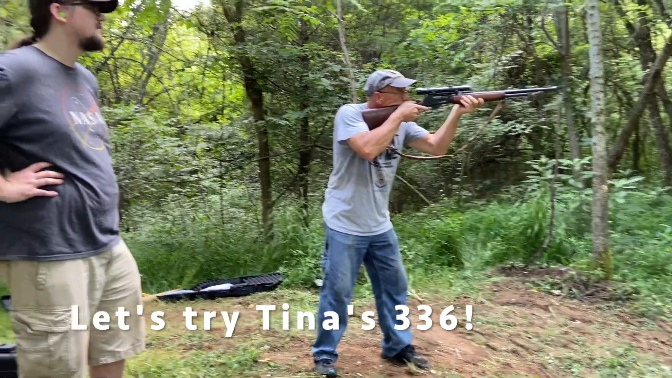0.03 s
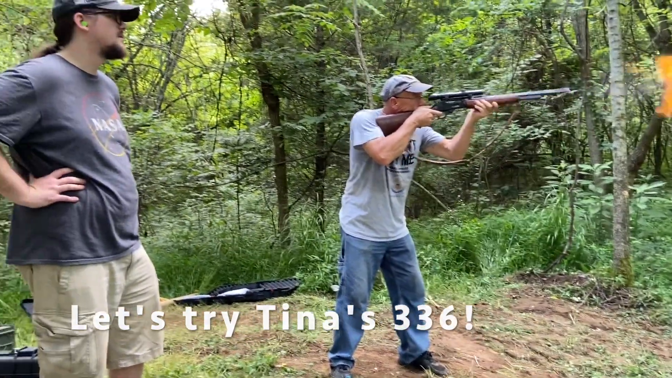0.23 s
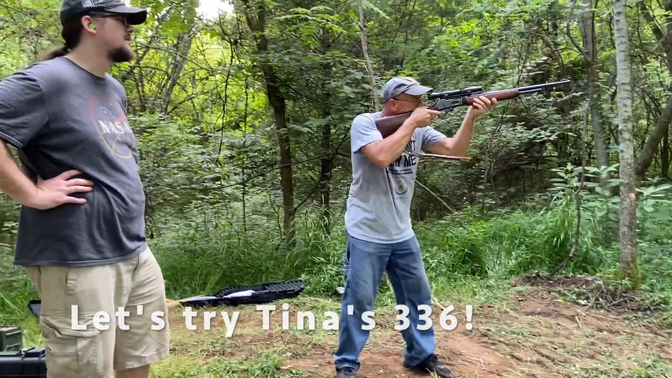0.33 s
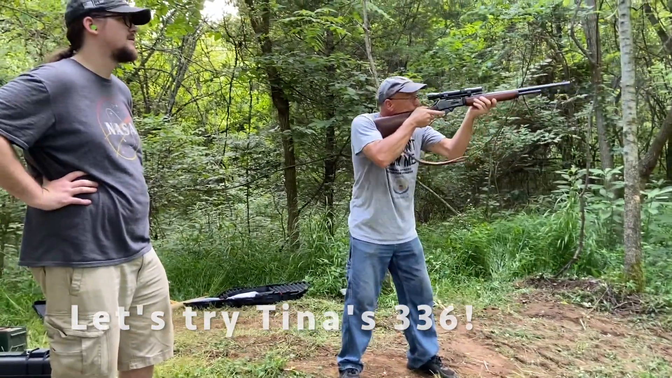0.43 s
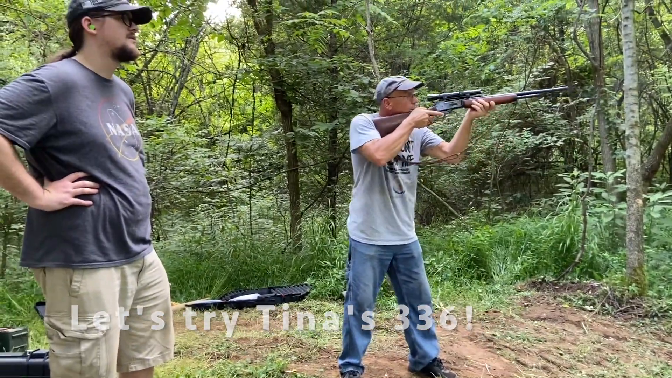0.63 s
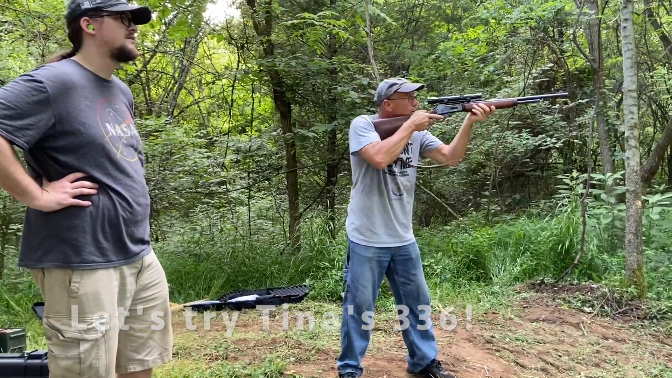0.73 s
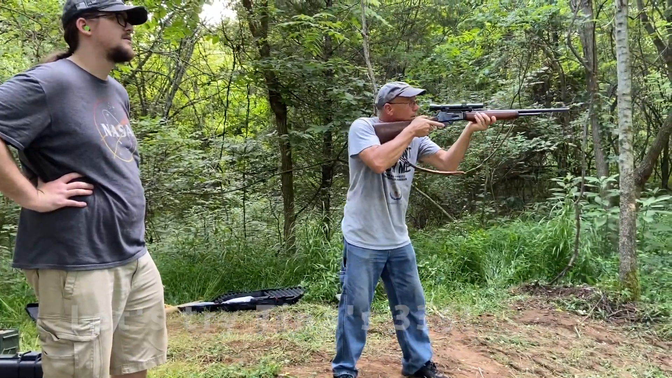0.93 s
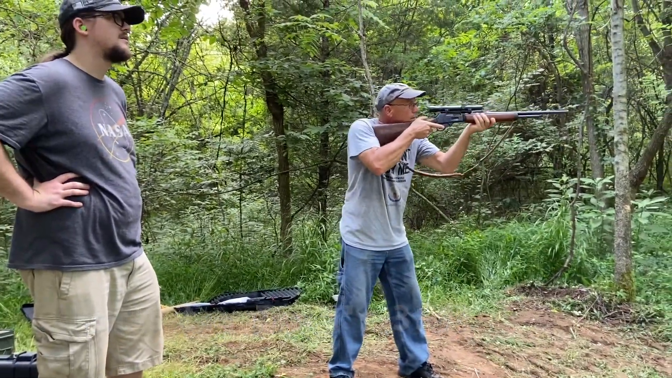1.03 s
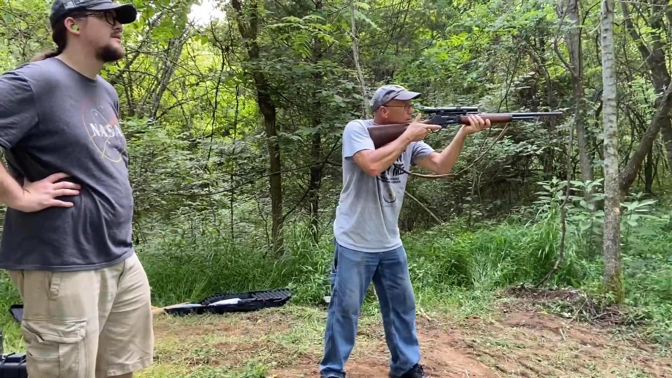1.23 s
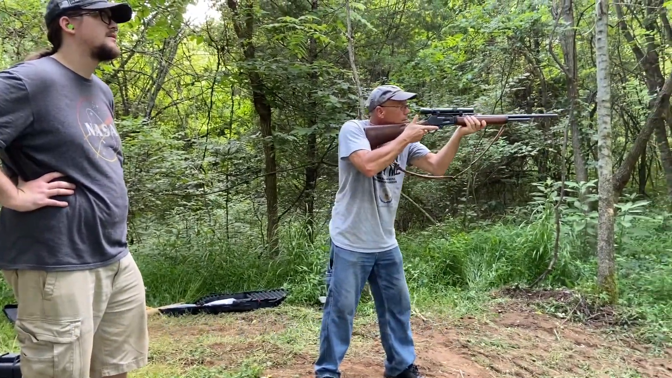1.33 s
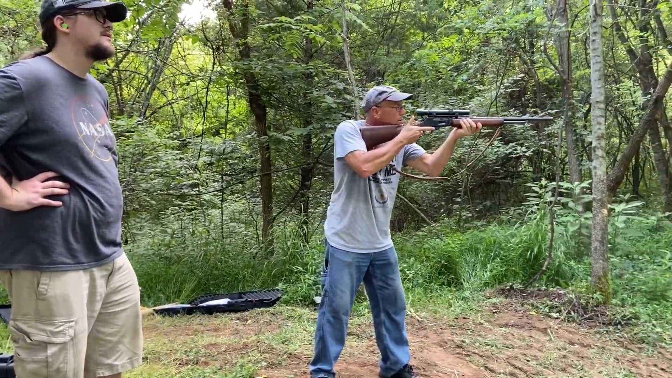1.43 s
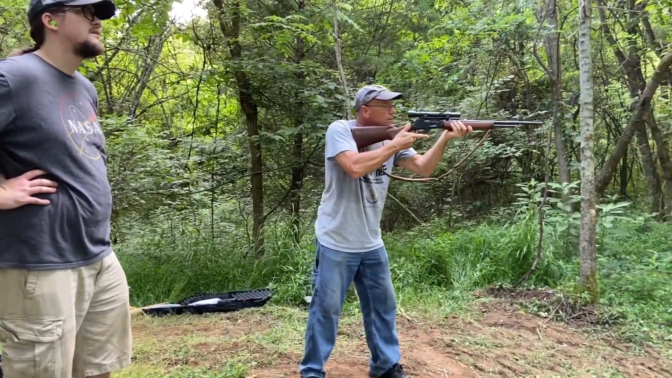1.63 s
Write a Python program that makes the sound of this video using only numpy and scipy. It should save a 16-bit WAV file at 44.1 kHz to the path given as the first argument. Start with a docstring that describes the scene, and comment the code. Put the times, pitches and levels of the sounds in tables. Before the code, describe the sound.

A rifle shot in a woodland clearing. Low rumbling air, soft hum and faint insects come first; at 0.19 s a tiny ringing, noisy swell leads into a sharp crack and short falling thump at 0.23 s. Background drops sharply. Echoes scatter from brush, swell from trees around 0.55 s and farther woods near 0.8 s, then fade. Light lever ticks at 1.18 s, firmer steel clacks at 1.55-1.61 s.

```python
"""One shot from a lever-action rifle in a woodland clearing: a noise crack and a falling sine thump,
led in by 30 ms of swelling, wavering tones and noise, and followed by decaying noise from brush and trees.
Then the lever is worked: ticks and clacks of short noise and ringing steel modes, with a faint falling whistle.
Behind lie rumbling air, a low hum and a narrow noise band of insects, all far lower after the shot."""
import sys
import numpy as np
from scipy import signal
from scipy.fft import rfft, irfft
from scipy.io import wavfile
from scipy.ndimage import uniform_filter1d

SR = 44100
rng = np.random.default_rng(int(sys.argv[2]) if len(sys.argv) > 2 else 0)


def wrap_up_sound(samples):
    """Save the sound to the file named by the first command line argument, as 16-bit audio."""
    columns = np.atleast_2d(samples).T
    # keep every value between -1 and 1, then stretch to whole-number steps
    tamed = np.clip(columns, -1, 1)
    steps = np.round(tamed * 32767).astype(np.int16)
    wavfile.write(sys.argv[1], SR, steps)


N = 74970
T = np.arange(N) / SR
CRACK_S = 0.2252


def amp(db):
    """Decibels to gain."""
    return 10 ** (np.asarray(db) / 20)


def evened(x):
    """Scales to rms 1."""
    return x / np.sqrt(np.mean(x ** 2) + 1e-20)


def read(points, hz):
    """Interpolates a table on a log-frequency axis."""
    f, value = np.transpose(points)
    return np.interp(np.log(hz + 1), np.log(f + 1), value)


def pan(db):
    """Left and right gains for a left-over-right level difference."""
    return evened(amp(np.array([[db], [-db]]) / 2))


def bins():
    """Frequencies of the full-length spectrum, Hz."""
    return np.fft.rfftfreq(N, 1 / SR)


def colour(points):
    """Gain per bin from a spectrum table."""
    return amp(read(points, bins()))


def noise(gain, same, grain_db=0):
    """Stereo noise of rms 1: gain per bin, left-right correlation, random level steps every 32 samples."""
    steps_db = grain_db * np.repeat(rng.standard_normal(N // 32 + 1), 32)[:N]
    a, b = rfft(rng.standard_normal((2, N)) * amp(steps_db))
    same = np.clip(same, -1, 1)
    right = same * a + np.sqrt(1 - same ** 2) * b
    return evened(irfft(np.array([a, right]) * gain, N))


def falling_sine(t, start_hz, end_hz, sag_s, sounding=1):
    """Sine whose pitch relaxes exponentially from start to end; phase runs only while sounding."""
    hz = end_hz + (start_hz - end_hz) * np.exp(-t / sag_s)
    return np.sin(2 * np.pi * np.cumsum(sounding * hz) / SR)


# Air rumble spectrum. Each row: frequency in Hz, relative level in dB per Hz.
AIR_SPECTRUM = [(25, -12), (60, 9.5), (110, -12.5), (200, -14), (400, -21), (800, -30.5), (1500, -34.5),
                (3000, -46), (7500, -51), (12000, -55.5), (16000, -70.5)]
AIR_DB, AIR_DROP_DB = -43, -22
HUM_HZ, HUM_DB, HUM_DROP_DB = 151, -53, -23.5
INSECT_HZ, INSECT_WIDTH_HZ, INSECT_DB, INSECT_DROP_DB = 5800, 220, -72, -29


def background():
    """Coloured noise, a sine hum and a Gaussian insect band; all drop over 50 ms from the crack."""
    after = np.clip((T - CRACK_S) / 0.05, 0, 1)
    air = noise(colour(AIR_SPECTRUM), same=0.71)
    hum = evened(np.sin(2 * np.pi * (HUM_HZ * T + rng.random())))
    insect_band = np.exp(-((bins() - INSECT_HZ) / INSECT_WIDTH_HZ) ** 2 / 2)
    insects = noise(insect_band, same=0.2)
    return (amp(AIR_DB + AIR_DROP_DB * after) * air
            + amp(HUM_DB + HUM_DROP_DB * after) * hum
            + amp(INSECT_DB + INSECT_DROP_DB * after) * insects)


SWELL_S, SWELL_RISE_S, SWELL_FALL_S = 0.19474, 0.011, 0.0016


def swell(lag_s):
    """Linear rise, hold, exponential fall from the crack."""
    rise = np.clip((T - SWELL_S - lag_s) / SWELL_RISE_S, 0, 1)
    return rise * np.exp(-np.maximum(T - CRACK_S, 0) / SWELL_FALL_S)


# Tones in the ringing swell before the crack. Each row: frequency in Hz, relative level in dB, pan in dB.
RING_TONES = [(218.6, 3.5, -14.5), (354, -0.5, 1.5), (432.2, 1, 2), (548, -5.5, -1), (797, -3.5, -4.5),
              (880, 1, -8.5), (1158, -2.5, -12.5), (1322, -2, -17), (1398, -13, 5), (1516, -7, -16),
              (1895, -6.5, -15), (2062, -13, -13.5), (2144, -12.5, -12), (2295, -15, -17.5),
              (2397, -9, -16), (2562, -7.5, 2), (2704, -12, -16), (3280, -18.5, -4), (3560, -17, -12),
              (3588, -14, -17.5), (4450, -22.5, 5.5), (4680, -12, -2), (4867, -10, -3), (5020, -9, 6),
              (5540, -14.5, 10), (5590, -13.5, 0), (7150, -20, 13)]
# Noise rush under the tones. Each row: frequency in Hz, relative level in dB per Hz.
RUSH_SPECTRUM = [(30, -8), (200, -4), (450, 0), (620, -2.5), (900, 2), (1700, -6), (2400, -8),
                 (4000, -15.5), (5400, -13.5), (6300, -26), (7300, -17.5), (9000, -39.5), (16000, -62)]
RING_DB, RING_WIDTH_HZ, RING_SAME = -11.5, 2, 0.8
RUSH_DB, RUSH_PAN_DB = -23.5, -11.5


def ringing_swell():
    """Phase-wandering tones over a noise rush; each tone starts one cycle late, so the low ones enter last."""
    ring = np.zeros((2, N))
    # constant phase lead of the right channel
    apart = np.arccos(RING_SAME) * np.array([[0], [1]])
    for hz, db, pan_db in RING_TONES:
        drift = np.cumsum(rng.standard_normal(N)) * np.sqrt(2 * np.pi * RING_WIDTH_HZ / SR)
        tone = np.sin(2 * np.pi * (hz * T + rng.random()) + drift + apart)
        ring += amp(db) * pan(pan_db) * swell(1 / hz) * tone
    ring_rms = np.sqrt(sum(amp(db) ** 2 for _, db, _ in RING_TONES) / 2)
    rush = pan(RUSH_PAN_DB) * swell(0) * noise(colour(RUSH_SPECTRUM), same=0.2)
    return amp(RING_DB) * ring / ring_rms + amp(RUSH_DB) * rush


# Crack spectrum. Each row: frequency in Hz, relative level in dB per Hz.
CRACK_SPECTRUM = [(60, -5), (500, -6.5), (2200, 7.5), (4000, -8), (7000, -6), (11000, -8.5), (16000, -27.5)]
CRACK_DB, CRACK_DECAY_S = -6.5, 0.0008
THUMP_DB, THUMP_START_HZ, THUMP_END_HZ = -9, 662, 72
THUMP_SAG_S, THUMP_LENGTH_S = 0.0028, 0.013


def blast():
    """Noise crack with a two-sided exponential envelope, then a falling sine under a Gaussian decay."""
    crack_level = amp(CRACK_DB) * np.exp(-abs(T - CRACK_S) / CRACK_DECAY_S)
    crack = crack_level * pan(db=-4.0) * noise(colour(CRACK_SPECTRUM), same=-0.21)
    t = np.maximum(T - CRACK_S, 0)
    thump = falling_sine(t, THUMP_START_HZ, THUMP_END_HZ, THUMP_SAG_S, sounding=t > 0)
    return crack + amp(THUMP_DB) * thump * np.exp(-(t / THUMP_LENGTH_S) ** 2)


# Left-right correlation of the echoes. Each row: frequency in Hz, correlation 0-1.
ECHO_SAME = [(60, 0.98), (200, 0.9), (500, 0), (1200, 0), (16000, 0.6)]
PATCH_RMS_DB, PATCH_HZ, PATCH_S = 1.58, 220, 0.045


def echo(spectrum, t60s, peak_s, rise_db_per_s, grain_db, crest_s=1 / SR):
    """Scattered reflections: noise builds to a rounded crest, dies at a rate per band, and rolls in patches."""
    source = noise(colour(spectrum), read(ECHO_SAME, bins()), grain_db)
    hz, t, z = signal.stft(source, SR, nperseg=512)
    # softened seconds before and after the peak
    before, after = crest_s * np.logaddexp(0, np.array([peak_s - t, t - peak_s]) / crest_s)
    level_db = -rise_db_per_s * before - 60 * after / read(t60s, hz)[:, None]
    patches = rng.standard_normal(level_db.shape)
    patches = uniform_filter1d(patches, max(1, round(PATCH_HZ / hz[1])), axis=0)
    patches = evened(uniform_filter1d(patches, max(1, round(PATCH_S / t[1])), axis=1))
    shaped = signal.istft(z * amp(level_db + PATCH_RMS_DB * patches), SR, nperseg=512)[1][:, :N]
    return shaped * np.clip((T - CRACK_S) / 0.0074, 0, 1)


# Echo spectra: near brush, tree line, far woods. Each row: frequency in Hz, relative level in dB per Hz.
BRUSH_SPECTRUM = [(30, -3), (90, 0.5), (200, 0), (380, -3), (900, -1.5), (2000, -7), (4000, -11),
                  (7000, -14.5), (9000, -26), (11500, -18.5), (16000, -34.5)]
TREES_SPECTRUM = [(30, -17), (90, 5), (140, 3), (220, -8.5), (500, 3), (900, 2.5), (1400, -6), (2500, -3),
                  (4000, -13), (7500, -19), (9200, -34), (11500, -26), (14000, -54.5)]
FAR_SPECTRUM = [(30, -13), (75, 6), (170, -14), (320, -0.5), (480, 3.5), (950, -13.5), (1500, -11),
                (2500, -22.5), (4500, -39), (8000, -58), (16000, -69)]
# Echo decays. Each row: frequency in Hz, time to fall 60 dB in seconds.
BRUSH_DECAY = [(100, 0.41), (900, 0.4), (4000, 0.56), (14000, 0.56)]
TREES_DECAY = [(100, 0.86), (450, 1.5), (850, 2.63), (2000, 0.93), (5000, 0.62), (12000, 0.43)]
FAR_DECAY = [(100, 4.7), (330, 6.4), (900, 2.73), (5000, 2.6)]
BRUSH_DB, TREES_DB, FAR_DB = -22, -30.5, -40.5
TREES_S, TREES_RISE_DB_PER_S, TREES_CREST_S = 0.55, 42, 0.025
FAR_S, FAR_RISE_DB_PER_S, FAR_CREST_S = 0.77, 33.5, 0.068


def woods():
    """Reflections from brush peak at once, from the tree line later, from the far woods last."""
    brush = echo(BRUSH_SPECTRUM, BRUSH_DECAY, CRACK_S, 0, grain_db=1.5)
    trees = echo(TREES_SPECTRUM, TREES_DECAY, TREES_S, TREES_RISE_DB_PER_S, grain_db=1.5, crest_s=TREES_CREST_S)
    far = echo(FAR_SPECTRUM, FAR_DECAY, FAR_S, FAR_RISE_DB_PER_S, grain_db=2.5, crest_s=FAR_CREST_S)
    return (amp(BRUSH_DB) * pan(db=0.6) * brush
            + amp(TREES_DB) * pan(db=-0.2) * trees
            + amp(FAR_DB) * pan(db=-0.6) * far)


# Lever, bolt and hammer contacts. Each row: start in seconds, level in dB, decay in seconds,
# brightness in dB per octave (flattens in the bass), steel ring in dB, pan in dB.
CONTACTS = [(1.183, -48, 0.0049, -5, -5, -1), (1.188, -51.5, 0.0098, -3, -10, 4),
            (1.194, -46.5, 0.0022, 6.5, -10, 1), (1.5481, -49.5, 0.016, -0.5, -6, 0),
            (1.556, -51, 0.0034, 1, -24, -8), (1.561, -33.5, 0.0038, -1, -3, 0),
            (1.5693, -43, 0.0099, 3, -12, 0), (1.6047, -32, 0.0015, 4, -29.5, 0.5),
            (1.609, -47.5, 0.0033, 5, -14, -7)]
# Rattle spectrum of the action. Each row: frequency in Hz, relative level in dB per Hz.
ACTION_SPECTRUM = [(200, -44), (800, 3), (1250, 9), (1900, 3), (3000, 1), (4200, 0), (6500, -9),
                   (7500, -1.5), (9000, -16), (11500, -4.5), (13500, -19), (15500, -9)]
# Steel modes. Each row: frequency in Hz, relative level in dB, time to fall 60 dB in seconds.
STEEL_MODES = [(1173, -8.5, 0.045), (1280, -3.5, 0.036), (1410, -10, .035), (2310, -9.5, 0.06),
               (2510, -5, 0.042), (2947, -1, 0.026), (4550, -16, 0.064), (4900, -22, 0.05),
               (5840, -26, 0.036), (7290, -3.5, 0.023), (7400, -5, 0.022), (12200, -26, 0.021)]
CONTACT_RISE_S, CONTACT_GRAIN_DB = 0.00045, 2.5
CONTACT_ECHO_DB, CONTACT_ECHO_T60_S = -20, 0.23


def steel_ring(t):
    """Decaying sine modes; the channels differ in phase by up to a third of a cycle."""
    ring = np.zeros((2, N))
    for hz, db, t60_s in STEEL_MODES:
        cycles = hz * t + rng.random() + rng.random((2, 1)) / 3
        ring += amp(db - 60 * t / t60_s) * np.sin(2 * np.pi * cycles)
    return ring


def lever():
    """Each contact is a short noise rattle that rings the steel and comes back faintly from the brush."""
    out = np.zeros((2, N))
    for start_s, db, decay_s, bright_db, ring_db, pan_db in CONTACTS:
        t = np.maximum(T - start_s, 0)
        tone = colour(ACTION_SPECTRUM) * amp(bright_db * np.log2(bins() / 3000 + 0.14))
        rattle = noise(tone, same=0.61, grain_db=CONTACT_GRAIN_DB) * np.exp(-t / decay_s)
        tail_level = amp(CONTACT_ECHO_DB - 60 * t / CONTACT_ECHO_T60_S)
        tail = noise(tone, same=0.2, grain_db=CONTACT_GRAIN_DB) * tail_level
        rise = np.minimum(t / CONTACT_RISE_S, 1)
        out += amp(db) * pan(pan_db) * rise * (rattle + amp(ring_db) * steel_ring(t) + tail)
    return out


CHIRP_S, CHIRP_DB, CHIRP_PEAK_S = 1.458, -84, 0.011
CHIRP_START_HZ, CHIRP_END_HZ, CHIRP_SAG_S = 5050, 4560, 0.009


def chirp():
    """Faint, thin whistle: a sine that falls and levels off under a rise-and-decay envelope."""
    t = np.maximum(T - CHIRP_S, 0)
    envelope = t / CHIRP_PEAK_S * np.exp(1 - t / CHIRP_PEAK_S)
    return amp(CHIRP_DB) * envelope * falling_sine(t, CHIRP_START_HZ, CHIRP_END_HZ, CHIRP_SAG_S)


def scene():
    """Background, ringing swell, blast, echoes, lever and whistle."""
    return background() + ringing_swell() + blast() + woods() + lever() + chirp()


EDGE_HZ = 16100


def record(dry):
    """Rounds peaks off near full scale, then low-passes at the band edge."""
    held = dry / (1 + dry ** 6) ** (1 / 6)
    lowpass = signal.firwin(511, EDGE_HZ, window=("kaiser", 9), fs=SR)
    return signal.oaconvolve(held, lowpass[None], "same")


dry = scene()
out = record(dry)
wrap_up_sound(out)
```